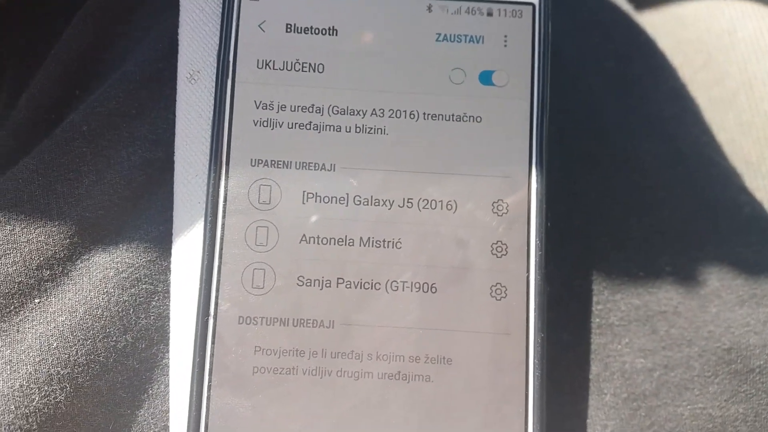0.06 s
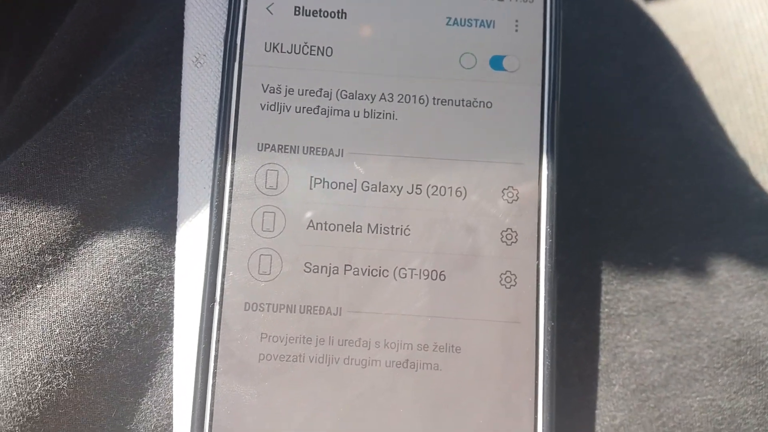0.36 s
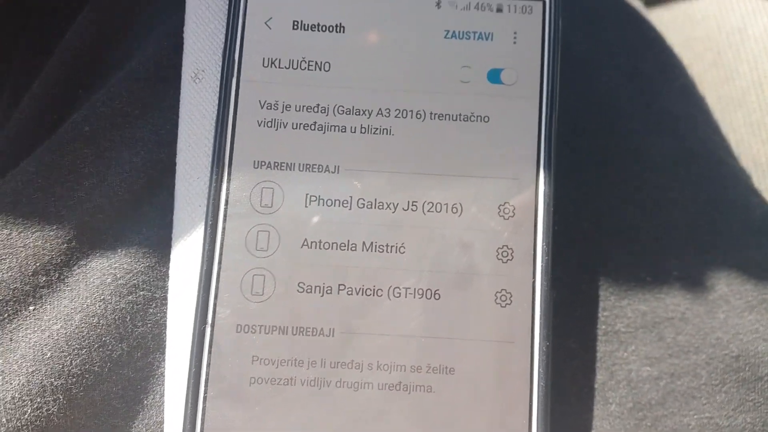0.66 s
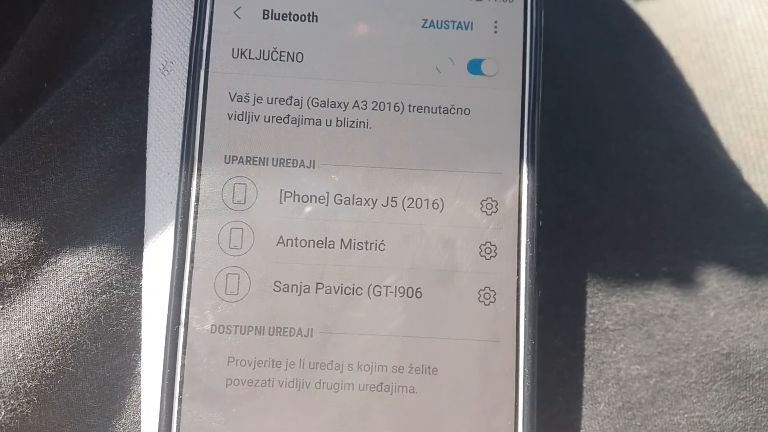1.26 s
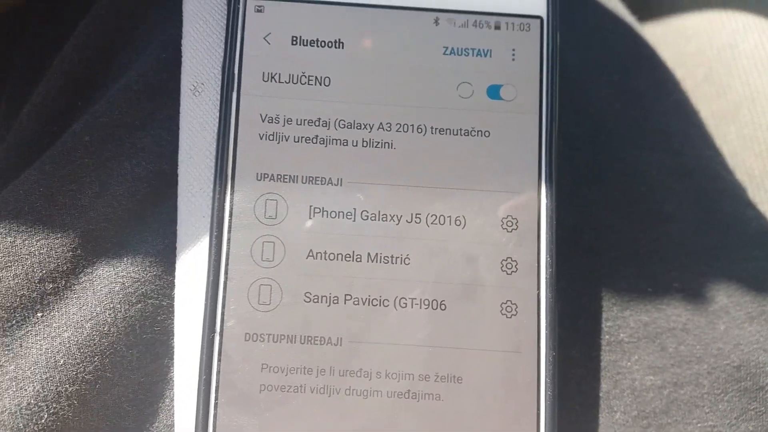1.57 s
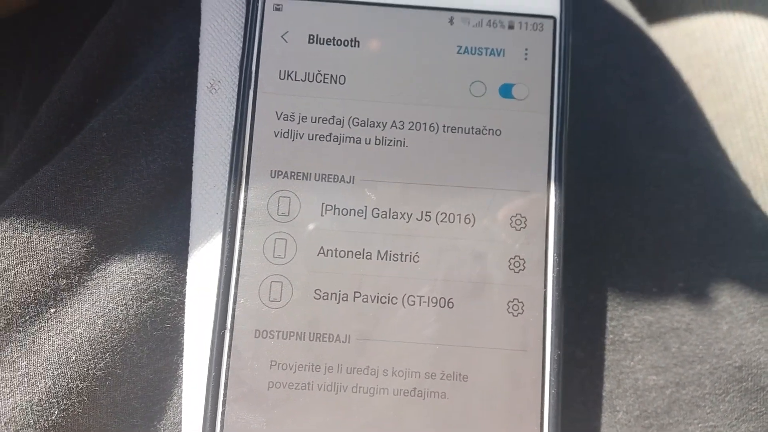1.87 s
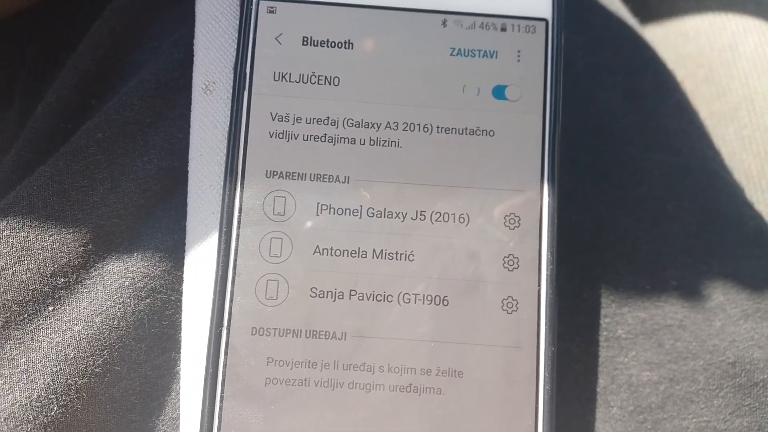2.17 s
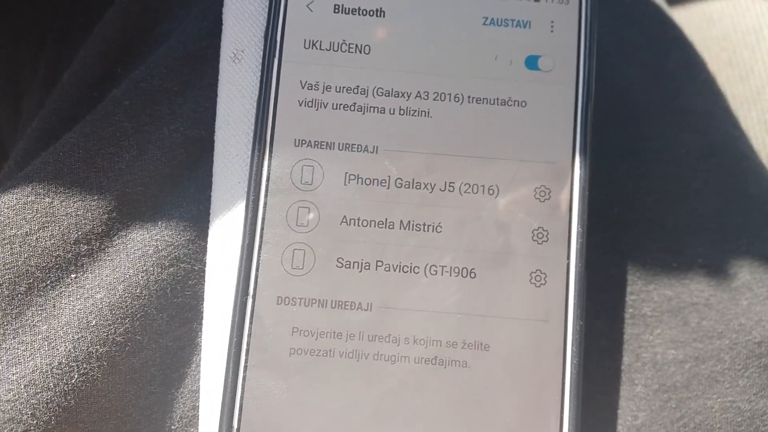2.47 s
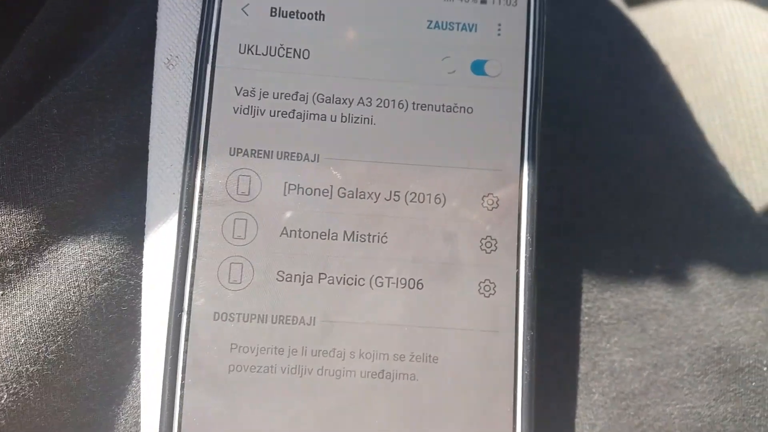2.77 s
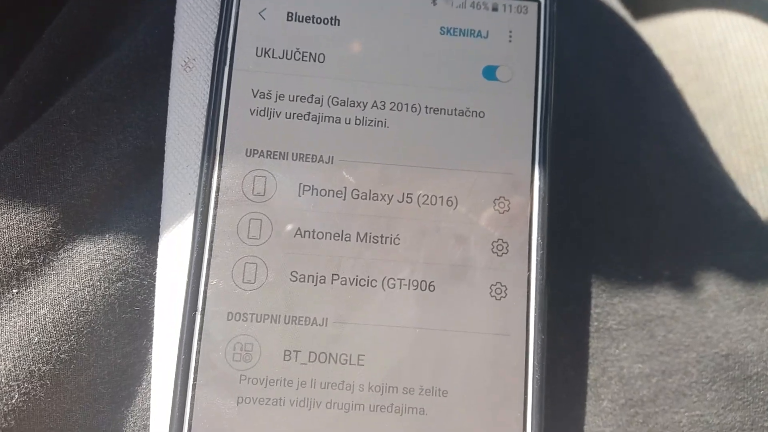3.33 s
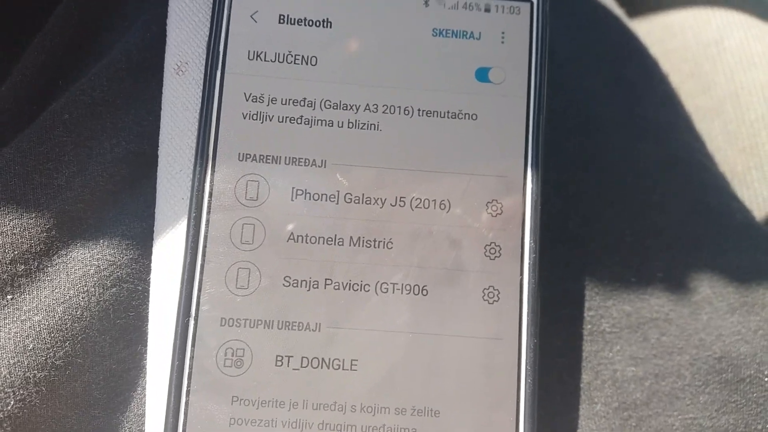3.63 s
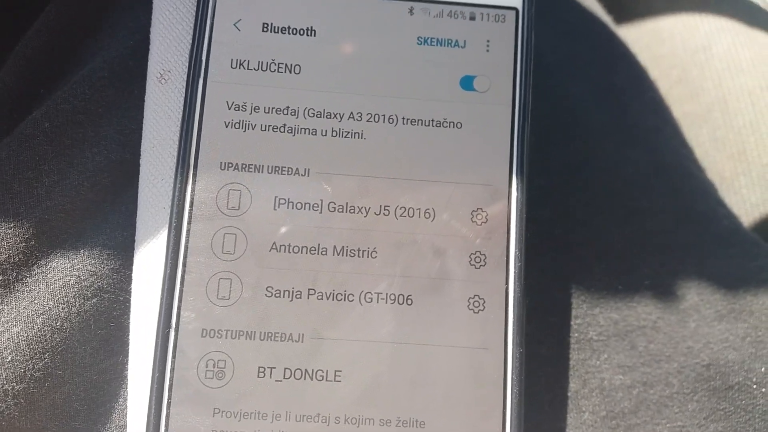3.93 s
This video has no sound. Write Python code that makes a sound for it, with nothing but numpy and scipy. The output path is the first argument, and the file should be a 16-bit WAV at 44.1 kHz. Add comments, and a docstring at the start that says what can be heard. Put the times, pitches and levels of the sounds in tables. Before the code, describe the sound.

A small bird gives thin, falling chirps in two pairs over quiet outdoor rumble and hiss.

```python
"""A small bird gives four thin, falling chirps in two pairs, with one faint high peep between the pairs.
Each is a gliding, nearly pure tone, smeared by reflections from nearby surfaces.
Beneath lie a low rumble, a faint hum, a quiet hiss and a few calls of distant birds.
Close to the microphone, brief forces excite damped modes: a soft handling thump,
several fainter bumps and one small click."""
import sys
import numpy as np
from scipy import signal
from scipy.fft import rfft, irfft
from scipy.io import wavfile

SR = 44100
rng = np.random.default_rng(int(sys.argv[2]) if len(sys.argv) > 2 else 0)


def waveform_to_disk(signal):
    """Save audio, clipped to [-1, 1], as 16-bit WAV at the path in sys.argv[1]."""
    frames = np.transpose(np.atleast_2d(signal))
    scaled = np.clip(frames, -1, 1) * 32767
    samples = np.round(scaled).astype(np.int16)
    wavfile.write(sys.argv[1], SR, samples)


N = 176400
TIME = np.arange(N) / SR

# spectrum of the rumble: f/Hz, relative spectral level/dB
RUMBLE_SPECTRUM = [(20, -27), (32, -18), (50, -5.5), (70, 3.5), (92, 2.5), (118, -3.5), (150, -11.5),
                   (200, -17.5), (265, -18.5), (330, -28.5), (600, -50.5)]
# envelope of the rumble: t/s, rms level/dB
RUMBLE_ENVELOPE = [(0, -48), (.8, -48.5), (1.6, -49), (2.8, -49), (3.15, -47.5), (3.6, -50), (4, -50.5)]
# partials of the hum: f/Hz, rms level/dB
HUM_PARTIALS = [(73, -57), (97, -58.5), (139, -61), (231, -74.5), (280, -73), (375, -71)]
# spectrum of the hiss: f/Hz, relative spectral level/dB
HISS_SPECTRUM = [(100, -5), (400, 1), (700, -0.5), (1100, -3), (1700, -3.5), (2500, -5), (3300, -9),
                 (4800, -12), (6300, -18), (8000, -19), (10000, -16), (12500, -12), (15500, -5.5)]
# notes of distant birds: centre t/s, duration/s, f/Hz, level/dB
DISTANT_NOTES = [(.59, .07, 930, -69), (.715, .06, 1000, -65), (.84, .12, 1060, -70),
                 (1.86, .16, 2300, -71)]
# contour of each falling whistle, one list per chirp: t/s, f/Hz, relative level/dB
CHIRP_CONTOURS = [
    [(1.056, 5440, -65), (1.061, 5190, -51.5), (1.067, 4670, -70), (1.074, 4220, -61), (1.087, 3720, -61),
     (1.098, 3250, -71)],
    [(1.214, 6200, -70), (1.230, 5450, -59), (1.237, 4730, -69), (1.243, 4350, -50), (1.252, 4150, -56),
     (1.261, 3900, -42.5), (1.274, 3500, -55), (1.290, 3500, -62)],
    [(2.522, 6270, -74), (2.537, 6120, -65), (2.545, 6100, -73)],
    [(2.661, 5550, -58), (2.663, 5390, -49), (2.668, 4590, -65), (2.675, 4320, -38.5), (2.683, 4070, -48),
     (2.692, 3760, -70), (2.702, 3420, -52), (2.712, 3430, -61)],
    [(2.906, 5460, -60), (2.913, 5200, -42.5), (2.923, 4830, -48), (2.930, 4620, -57), (2.943, 4440, -50),
     (2.949, 4280, -43.5), (2.964, 4090, -56), (2.980, 3840, -49), (2.989, 3700, -77)],
]
# reflections from nearby surfaces, one row per chirp: relative level/dB, T60/s
NEAR_REFLECTIONS = [(-1, 0.26), (-2.5, 0.16), (-8, 0.13), (-7.5, .075), (-6, .06)]
# narrow bands in which the surroundings ring on: f/Hz, peak gain/dB, T60/s
SURROUNDING_RESONANCES = [(3580, -7, .35), (4300, -9, 0.1), (5280, -4, .12)]
# soft handling impacts: t/s, impulse level/dB, contact time/s
BUMP_IMPACTS = [(2.280, -36, 0.0044), (2.4395, -20.5, 0.0037), (2.906, -32.5, 0.0074),
                (2.982, -25.5, 0.011), (3.162, -35, 0.0043), (3.173, -31, 0.0088), (3.251, -39, .002),
                (3.266, -28.5, .008), (3.471, -32.5, 0.0074)]
# modes excited by a bump: f/Hz, gain/dB, T60/s
BUMP_RESONANCES = [(74.2, -6, 0.19), (118, 0.5, 0.049), (174, 1, 0.034), (270, -6, 0.051)]
# the click and its small rebounds: t/s, impulse level/dB
CLICK_IMPACTS = [(3.2515, -30.5), (3.256, -53), (3.2600, -46), (3.2668, -40.5)]
# modes excited by the click: f/Hz, gain/dB, T60/s
CLICK_RESONANCES = [(1615, -19, .07), (1830, 0, 0.0061), (2260, -23, .04), (2830, -21, 0.029),
                    (3130, -8, .003), (4600, -19, .002)]


def from_db(db):
    """Amplitude ratio: a factor of ten for every 20 dB."""
    return 10 ** (np.asarray(db) / 20)


def unit_rms(x):
    """Normalisation to unit mean power."""
    return x / np.sqrt(np.mean(x ** 2) + 1e-20)


def drift(corner_hz):
    """Random fluctuation: white noise through a two-pole low-pass, at unit rms."""
    r = np.exp(-2 * np.pi * corner_hz / SR)
    return unit_rms(signal.lfilter([1], [1, -2 * r, r * r], rng.standard_normal(N + SR))[SR:])


def coloured_noise(spectrum):
    """Spectral shaping: white noise weighted over log frequency, at unit rms."""
    hz, db = np.transpose(spectrum)
    bins_hz = np.maximum(np.arange(N // 2 + 1) * SR / N, 1)
    gain = from_db(np.interp(np.log(bins_hz), np.log(hz), db))
    return unit_rms(irfft(rfft(rng.standard_normal(N)) * gain, N))


def rumble():
    """Amplitude modulation: low-frequency noise follows a slow envelope."""
    return from_db(np.interp(TIME, *np.transpose(RUMBLE_ENVELOPE))) * coloured_noise(RUMBLE_SPECTRUM)


def hum(waver_db=1, wander_hz=0.82):
    """Superposition of low partials, each wandering slightly in level and frequency."""
    out = 0
    for hz, db in HUM_PARTIALS:
        amplitude = np.sqrt(2) * from_db(db - waver_db * drift(1.26))
        phase = 2 * np.pi * np.cumsum(hz + wander_hz * drift(1.9)) / SR
        out = out + amplitude * np.sin(phase)
    return out


def hiss(level_db=-55.5):
    """Stationary broadband noise, heard as an even hiss."""
    return from_db(level_db) * coloured_noise(HISS_SPECTRUM)


def distant_birds(waver_share=0.035):
    """Random frequency modulation blurs faint notes that swell and fade in Gaussian envelopes."""
    phase_per_hz = 2 * np.pi * np.cumsum(1 + waver_share * drift(60)) / SR
    out = 0
    for centre, duration, hz, db in DISTANT_NOTES:
        envelope = from_db(db) * np.exp(-(2 * (TIME - centre) / duration) ** 2)
        out = out + envelope * np.sqrt(2) * np.sin(hz * phase_per_hz)
    return out


def bird(gain_db=-4.5, edge_s=0.0012, waver_share=0.0081, flutter_db=1.84):
    """Frequency glide: unsteady, nearly pure whistles fall fast and scatter off nearby surfaces."""
    waver = 1 + waver_share * drift(147)
    unsteady_db = gain_db + flutter_db * drift(160)
    out = 0
    for contour, (scatter_db, t60) in zip(CHIRP_CONTOURS, NEAR_REFLECTIONS):
        times, hz, db = np.transpose(contour)
        gate = np.clip(1 + np.minimum(TIME - times[0], times[-1] - TIME) / edge_s, 0, 1)
        envelope = gate * from_db(unsteady_db + np.interp(TIME, times, db))
        phase = 2 * np.pi * np.cumsum(np.interp(TIME, times, hz) * waver) / SR
        whistle = envelope * np.sqrt(2) * np.sin(phase)
        out = out + whistle + from_db(scatter_db) * reflections(whistle, t60)
    return out


def reflections(x, t60, delay_s=0.005):
    """Diffuse reverberation: convolution with exponentially decaying noise of unit energy."""
    t = TIME[:SR]
    response = rng.standard_normal(SR) * np.exp(-np.log(1000) * t / t60) * (t > delay_s)
    return signal.fftconvolve(x, response / np.sqrt(np.sum(response ** 2)))[:N]


def pole(hz, t60):
    """Damped oscillator: its decay factor and phase advance per sample."""
    return np.exp(-np.log(1000) / (t60 * SR)), 2 * np.pi * hz / SR


def resonance(x, hz, t60):
    """Forced resonance: a narrow band passes, with unit gain at its peak."""
    r, w = pole(hz, t60)
    return (1 - r * r) / 2 * signal.lfilter([1, 0, -1], [1, -2 * r * np.cos(w), r * r], x + 1e-18)


def surroundings(x, echo_s=0.09, echo_db=-24, tail_db=-23):
    """Resonance and reflection add ringing, one distant wall's echo and a reverberant tail."""
    ringing = sum(from_db(db) * resonance(x, hz, t60) for hz, db, t60 in SURROUNDING_RESONANCES)
    echo = from_db(echo_db) * np.interp(TIME - echo_s, TIME, x)
    return x + ringing + echo + from_db(tail_db) * reflections(x, t60=0.9)


def modal_response(force, modes):
    """Modal superposition: a force excites damped modes, which add with alternating signs."""
    out = 0
    for k, (hz, db, t60) in enumerate(modes):
        r, w = pole(hz, t60)
        mode = signal.lfilter([0, np.sin(w)], [1, -2 * r * np.cos(w), r * r], force + 1e-18)
        out = out + (-1) ** k * from_db(db) * mode
    return out


def handling_bumps():
    """Contact time limits bandwidth: the longer a padded impact lasts, the duller its knock."""
    force = 0
    for onset, db, contact_s in BUMP_IMPACTS:
        pulse = np.sin(np.pi * np.clip((TIME - onset) / contact_s, 0, 1)) ** 2
        force = force + from_db(db) * pulse / pulse.sum()
    return modal_response(force, BUMP_RESONANCES)


def click(scatter_db=-7.5):
    """Impulse excitation: a tap and its rebounds give a short, plastic-like ring with reflections."""
    force = np.zeros(N)
    for onset, db in CLICK_IMPACTS:
        force[int(onset * SR)] += from_db(db)
    direct = modal_response(force, CLICK_RESONANCES)
    return direct + from_db(scatter_db) * reflections(direct, t60=0.12)


def scene():
    """Linear superposition: all sources add at one microphone, the same in both channels."""
    background = rumble() + hum() + hiss()
    mono = background + surroundings(bird()) + distant_birds() + handling_bumps() + click()
    return np.array([mono, mono])


def record(dry, cutoff_hz=15800):
    """Band limiting: a steep elliptic low-pass removes the highest treble."""
    return signal.sosfilt(signal.ellip(12, .1, 80, cutoff_hz, fs=SR, output="sos"), dry)


dry = scene()
out = record(dry)
waveform_to_disk(out)
```